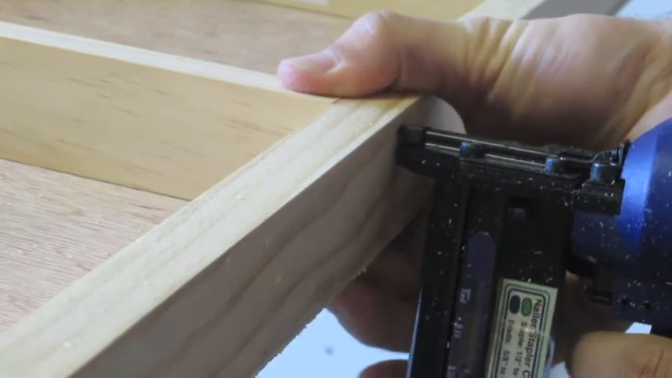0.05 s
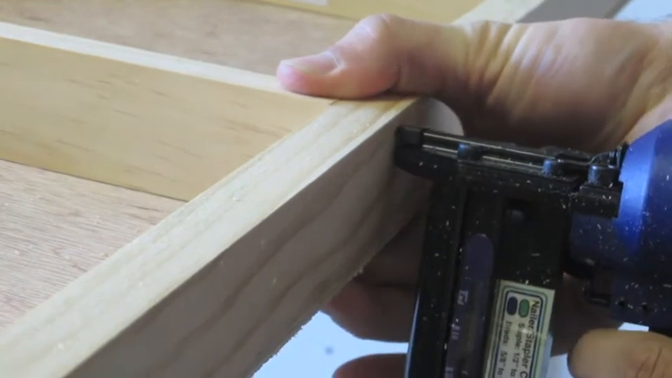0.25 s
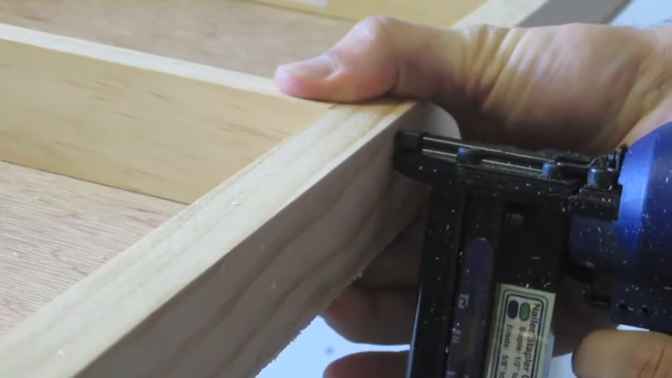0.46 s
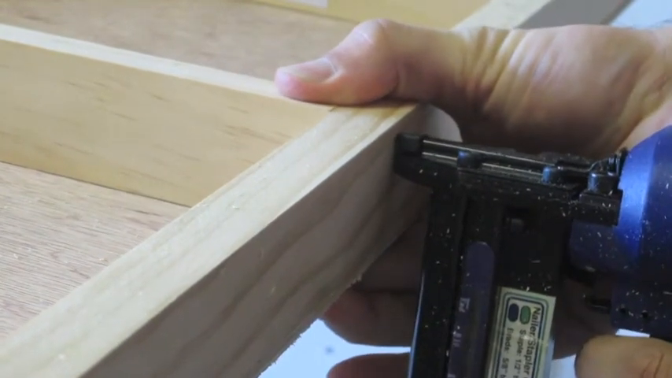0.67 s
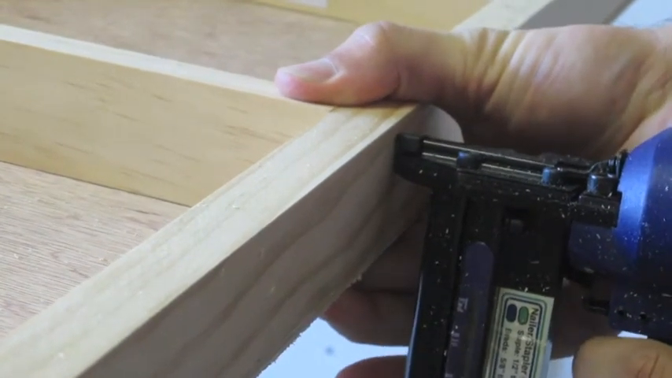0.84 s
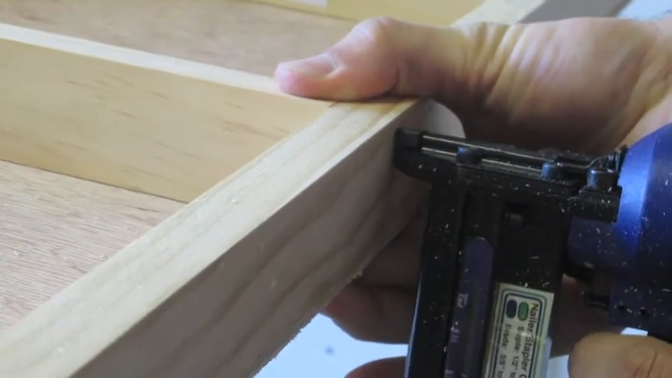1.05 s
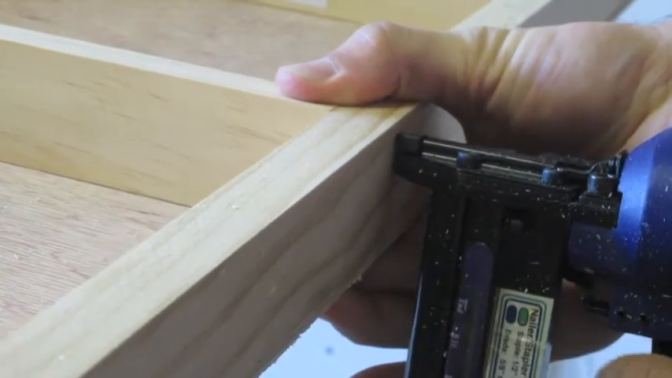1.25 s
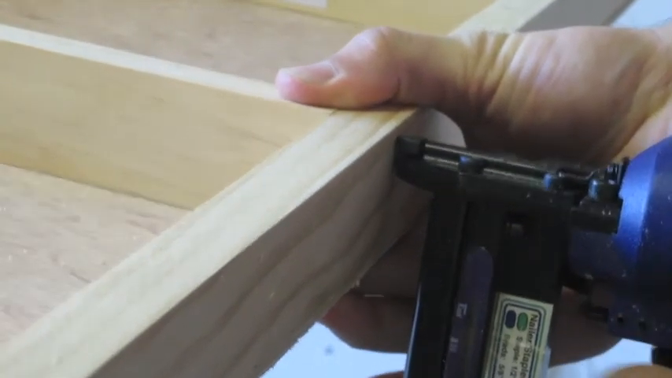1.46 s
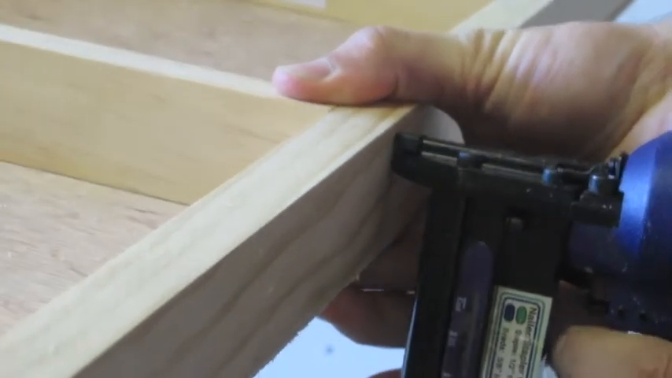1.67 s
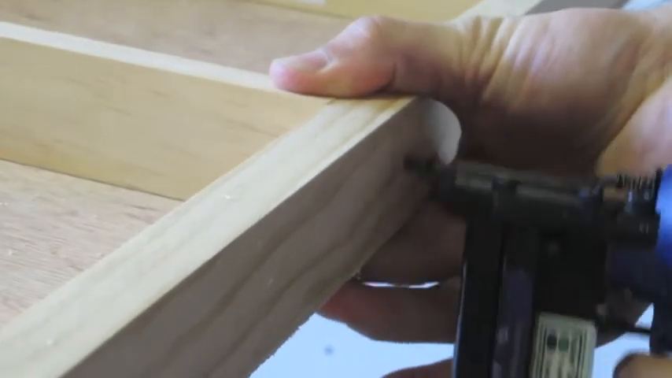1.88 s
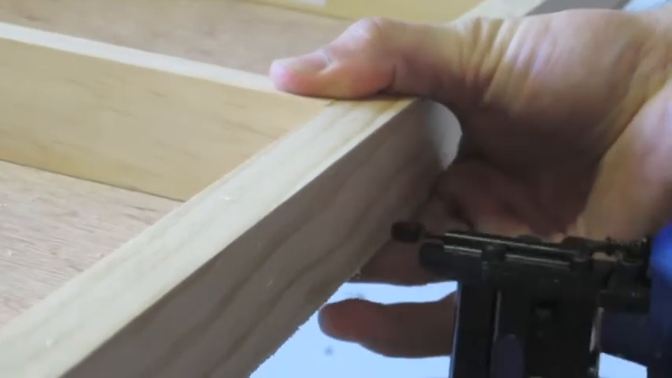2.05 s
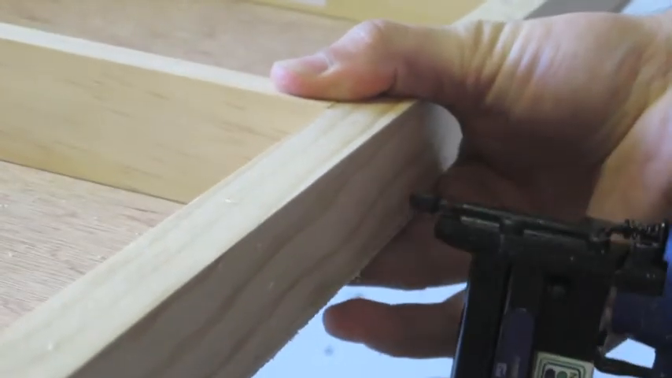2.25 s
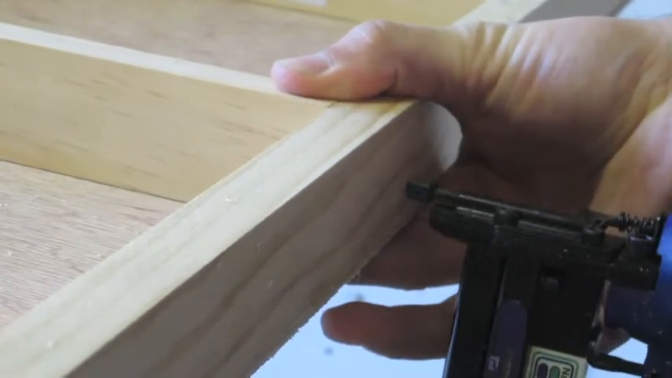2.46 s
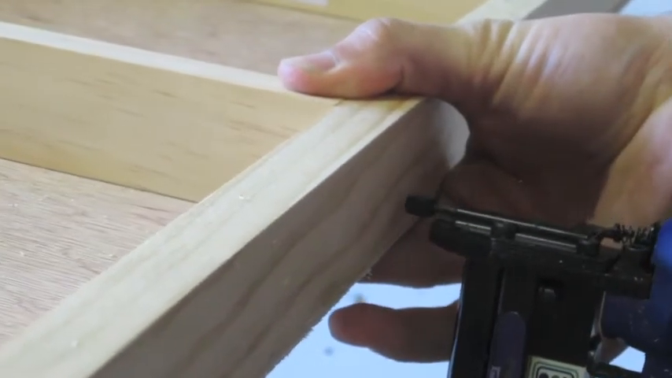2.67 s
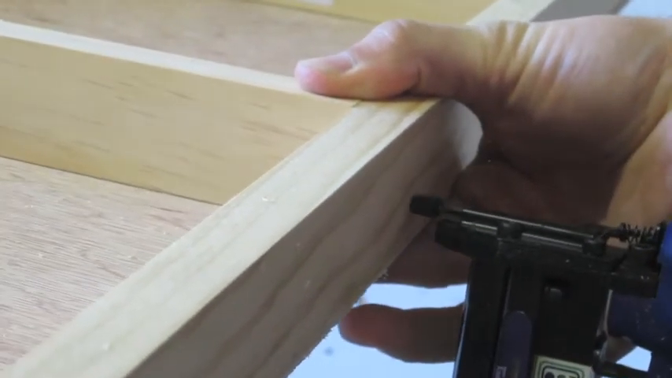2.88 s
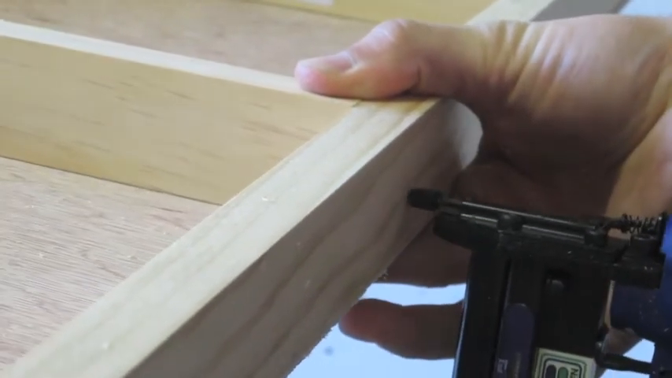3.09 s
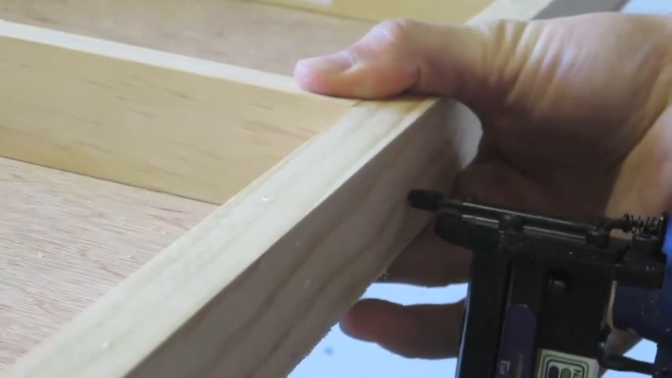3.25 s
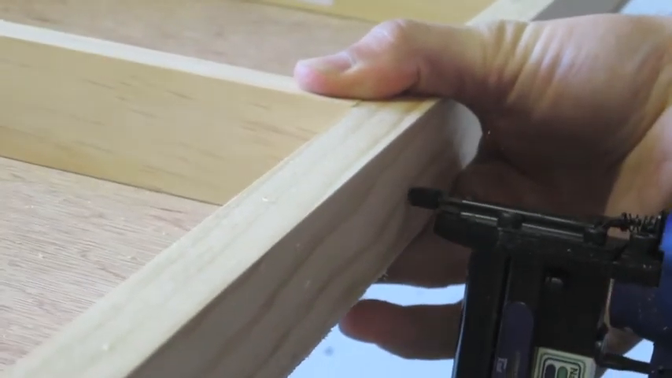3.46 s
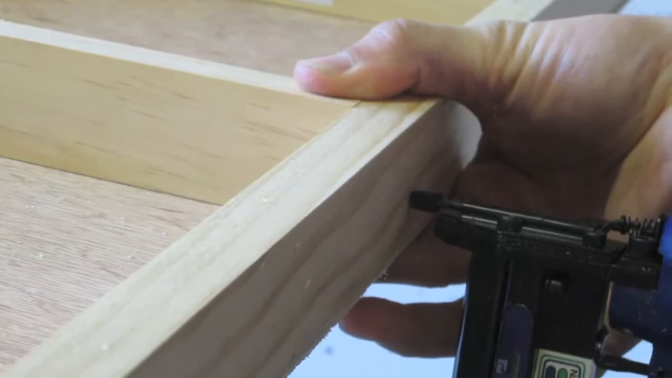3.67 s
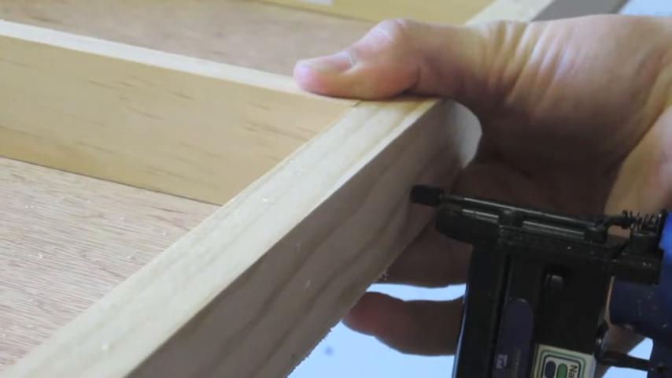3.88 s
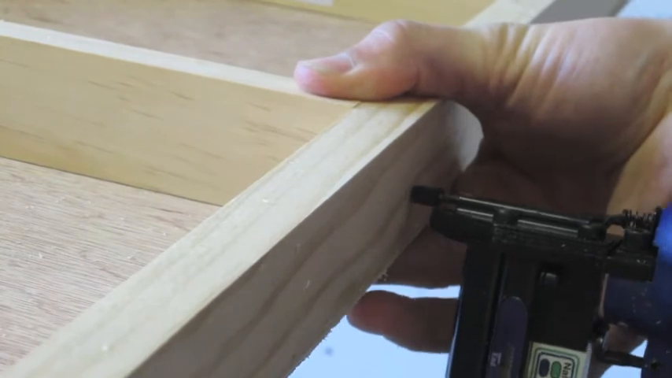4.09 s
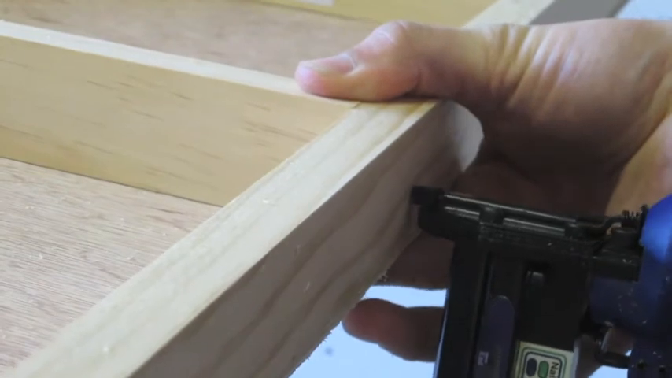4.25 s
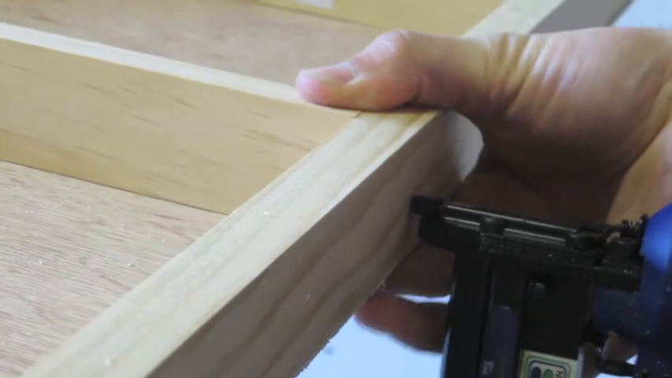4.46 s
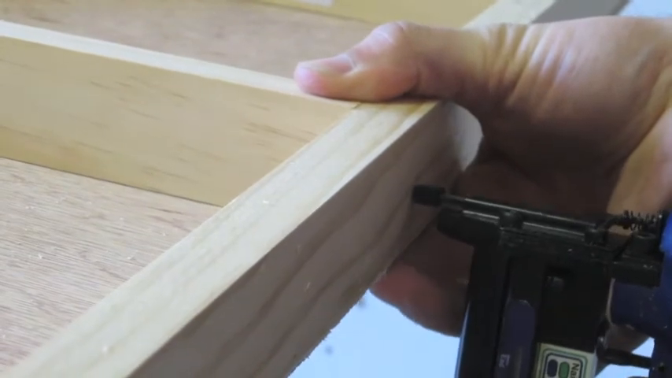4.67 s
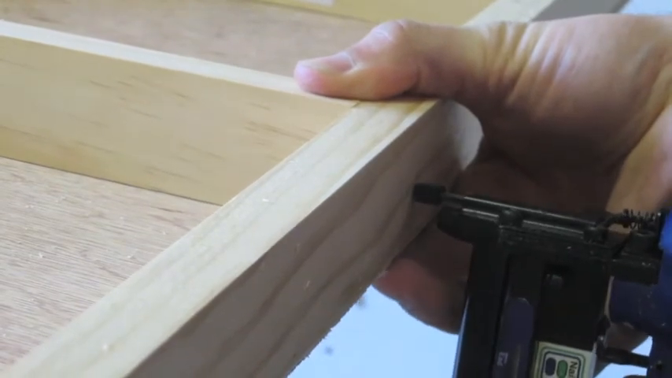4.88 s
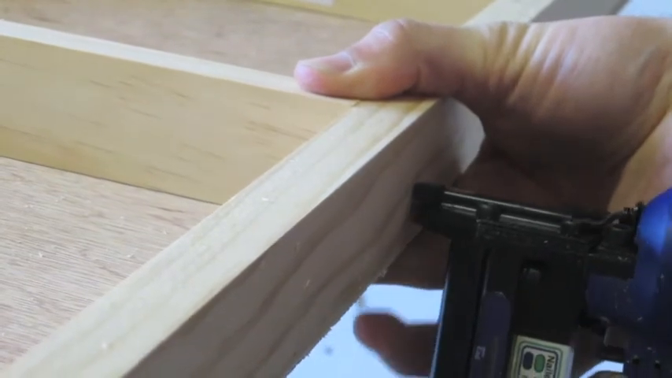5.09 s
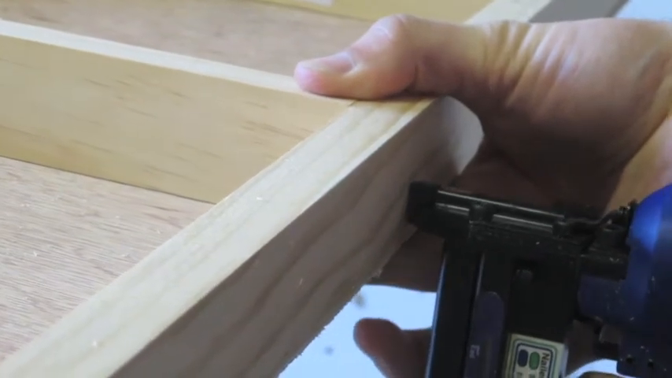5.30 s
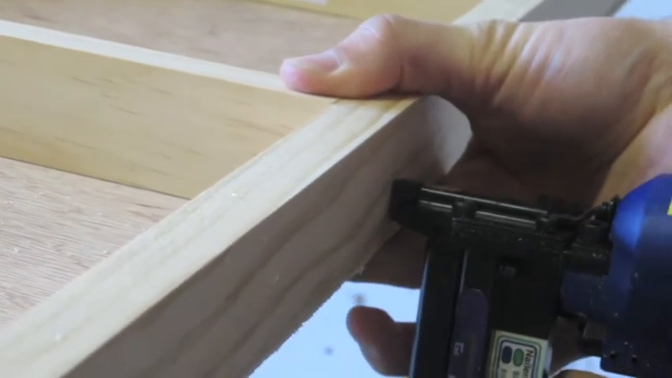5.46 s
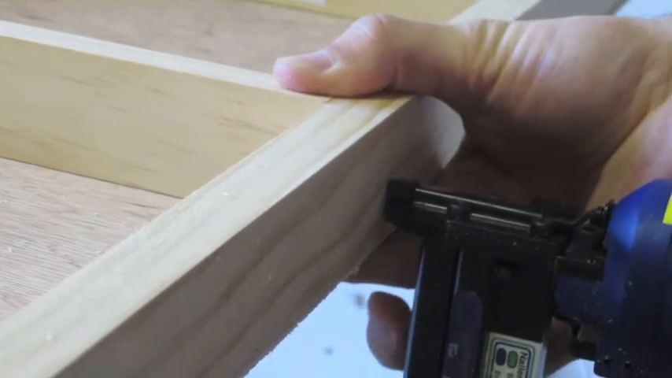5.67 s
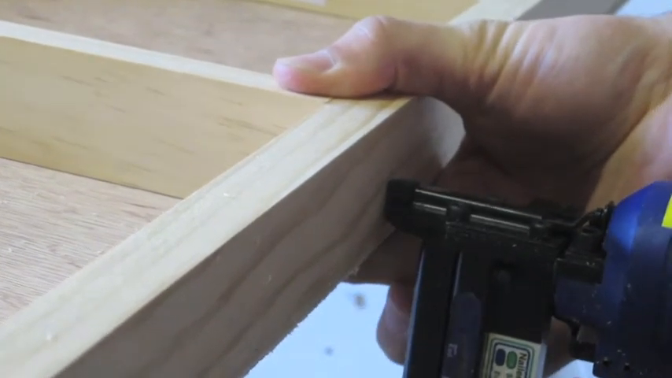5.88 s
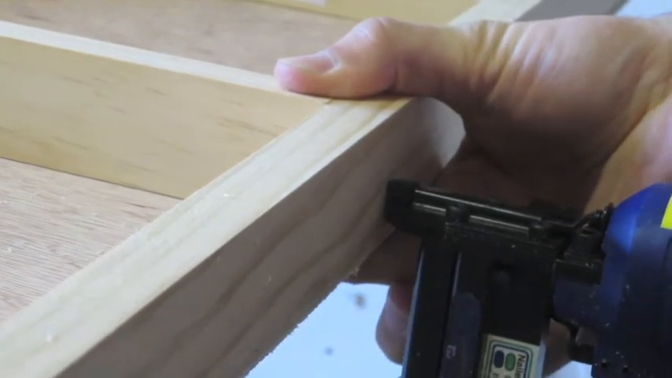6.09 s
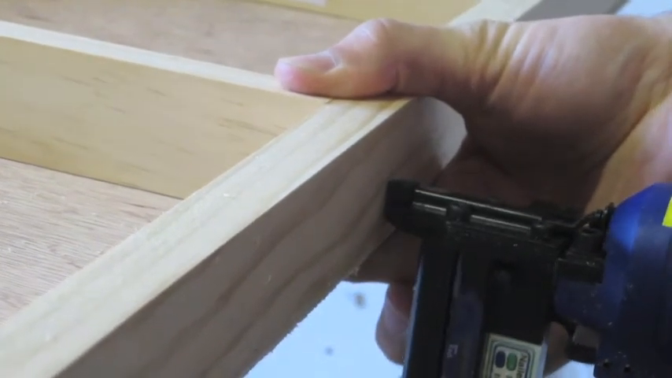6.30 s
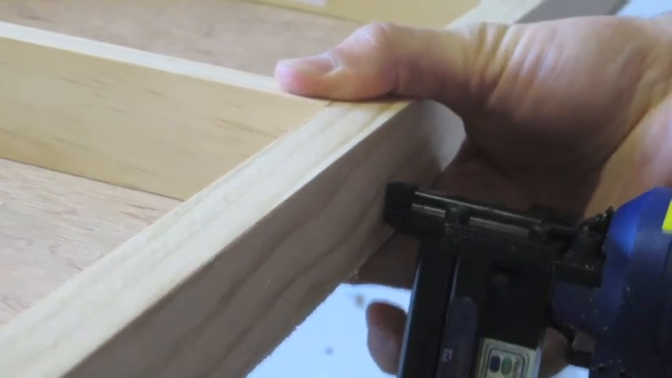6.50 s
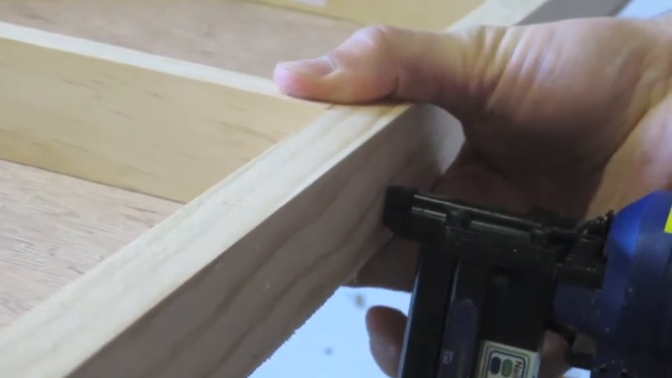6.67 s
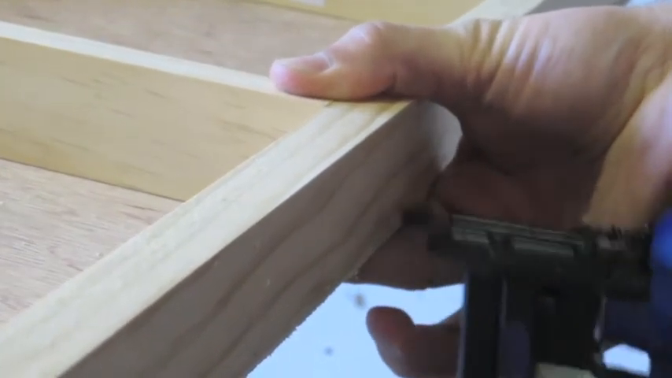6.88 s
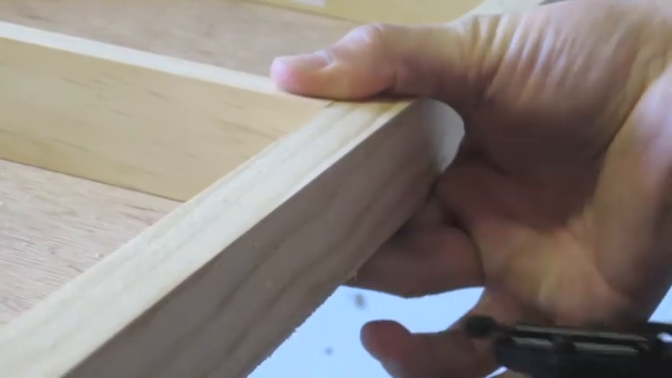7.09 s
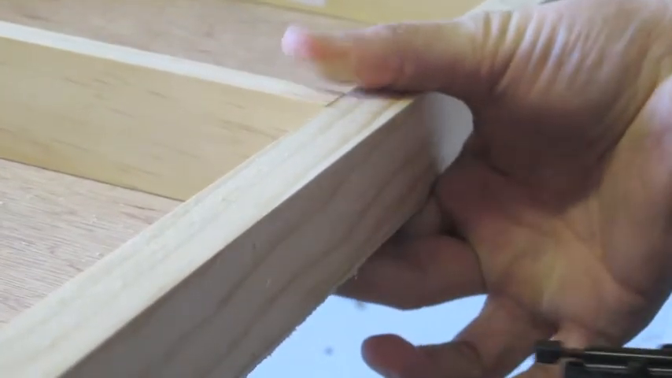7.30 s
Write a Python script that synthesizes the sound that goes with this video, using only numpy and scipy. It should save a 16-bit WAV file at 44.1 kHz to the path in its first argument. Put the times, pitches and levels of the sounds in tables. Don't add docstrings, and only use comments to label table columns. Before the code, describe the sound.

Low, soft workshop rumble. At 0.15 s the tool lightly knocks wood; cloth rustles and a thin, hoarse hose squeal wavers very faintly until 0.9 s, with tiny steel ticks around 0.95. At 1.29 a trigger tick, then at 1.32 a deafening sharp crack and woody slam, echoing brightly. At 1.52 a short dense air blast bursts out with a piston clack. The level ducks, then creeps back. A springy metallic chatter at 1.84 marks lift-off. Small clicks and knocks come at 2.8, 3.2, 3.4, 3.8 and 4.1, with soft rubbing near 2.6. Handling gets busier from 4.5 to 5.4: clacks, bumps, skin sliding on pine; another bump at 5.83. A tick at 6.31 leads into the second crack at 6.32, its exhaust at 6.51, ringing decay, then spring chatter at 6.86 and faint squeaks near 7.2.

```python
import sys
import numpy as np
from scipy import signal
from scipy.fft import rfft, irfft, next_fast_len
from scipy.io import wavfile
from scipy.ndimage import uniform_filter1d

SR = 44100
rng = np.random.default_rng(int(sys.argv[2]) if len(sys.argv) > 2 else 0)


def pcm_store(signal):
    levels = np.round(np.clip(np.atleast_2d(signal), -1, 1) * 32767)
    wavfile.write(sys.argv[1], SR, levels.astype(np.int16).T)


def nominal_scale(level):
    x = np.asarray(level, float) / 20
    return 10 ** x


N = 323780

# (time [s], push [dB], ring [dB], rattle [dB], room [dB])
BLOWS = [
    (1.3382, -12, -2, -14, 4),
    (6.3399, -17, -4, -14.5, 2.5),
]
# (valve opens [s], crack [dB], trigger lets go [s], exhaust [dB], piston stops [s])
SHOTS = [
    (1.315, -4.5, 1.519, -5, 1.542),
    (6.321, -5, 6.5078, -6, 6.531),
]
# (frequency [Hz], level per Hz [dB])
BLAST = [(35, -24.5), (60, -11.5), (691, -6.5), (1690, -12), (2190, -8), (2970, -7), (3420, -9),
         (3840, -6.5), (11300, -1.5), (15400, -7.5), (16500, -34.5)]


def unit(x):
    return x / np.sqrt(np.mean(x ** 2) + 1e-20)


def along(points, hz):
    f, v = np.transpose(points)
    return np.interp(np.log(hz + 1), np.log(f + 1), v)


def filtered(x, response):
    m = next_fast_len(len(x) + 4096)
    return irfft(rfft(x, m) * response(np.fft.rfftfreq(m, 1 / SR)), m)[:len(x)]


def resonant(modes):
    def response(f):
        return sum((-1) ** k * nominal_scale(db) * 1j * f * w / (c * c - f * f + 1j * f * w)
                   for k, (c, w, db) in enumerate(modes))
    return response


def hiss(n, spectrum):
    return unit(filtered(rng.standard_normal(n), lambda hz: nominal_scale(along(spectrum, hz))))


def shape(t, rise, hold, t60):
    return (1 - np.exp(-(np.maximum(t, 0) / rise) ** 2)) * nominal_scale(-60 * np.maximum(t - hold, 0) / t60)


def wander(n, size):
    return unit(uniform_filter1d(rng.standard_normal(n), size=size))


def tap(t, contact):
    return np.exp(-(t / contact - 2) ** 2)


def strikes(t, hits, grit_db, t60):
    force = nominal_scale(grit_db - 60 * t / t60) * rng.standard_normal(len(t))
    for s, db in hits:
        force[round(s * SR)] += nominal_scale(db)
    return force


def gain_db(s):
    rest_db, react_s, duck_s, creep_s = -0.28, 0.0085, 0.0048, 0.88
    blow_duck_db, stop_duck_db = -10.5, -5
    hold_s = (0.56, 0.85)
    out = rest_db + 0 * s
    for (blow_s, *_), (*_, stop_s), hold in zip(BLOWS, SHOTS, hold_s):
        left = np.exp(-np.maximum(s - stop_s - hold, 0) / creep_s)
        for at, db in ((blow_s, blow_duck_db), (stop_s, stop_duck_db)):
            out = out + left * db * np.clip((s - at - react_s) / duck_s, 0, 1)
    return out


def add(track, s, sound, room_db, modes=None, size=48):
    # (frequency [Hz], t60 [s])
    shop_t60 = [(100, 0.72), (300, 0.87), (1000, 0.82), (2500, 0.83), (5000, 0.75), (9000, 0.55),
                (15000, 0.36)]
    # (frequency [Hz], stretch of t60 [ratio])
    sheet_goods = [(1190, 1.2), (1560, 1.1), (2550, 1.5), (3600, 1.4), (5200, 0.84)]
    sheet_width_hz, peaky_db = 47, 2.5
    hz, t, z = signal.stft(rng.standard_normal(SR), SR, nperseg=512)
    if modes is None:
        power = uniform_filter1d(np.abs(rfft(sound, 8192)) ** 2, size=size)[::16]
        colour = np.sqrt(np.abs(power))
    else:
        colour = np.sqrt(sum(np.abs(resonant([mode])(hz)) ** 2 for mode in modes))
    colour = colour * (hz > 100)
    colour = colour * nominal_scale(peaky_db * rng.standard_normal(len(hz)))
    t60 = along(shop_t60, hz)
    for centre, stretch in sheet_goods:
        t60 = t60 * (1 + (stretch - 1) / (1 + ((hz - centre) / sheet_width_hz) ** 2))
    tail = signal.istft(z * colour[:, None] * nominal_scale(-60 * t / t60[:, None]), SR, nperseg=512)[1]
    middle = np.sum(np.arange(len(sound)) * sound ** 2) / np.sum(sound ** 2) / SR
    tail *= shape(np.arange(len(tail)) / SR - .003, 0.0086 + middle, 9, 1)
    out = nominal_scale(room_db) * tail * np.linalg.norm(sound) / np.linalg.norm(tail)
    out[:len(sound)] += sound
    part = track[round(s * SR):][:len(out)]
    part += out[:len(part)]


def air():
    # (frequency [Hz], level per Hz [dB])
    room_tone = [(12, -34.5), (20, -0.5), (51, -8), (89, -1.5), (265, -13), (440, -15.5), (492, -15),
                 (816, -12.5), (1050, -15.5), (1560, -19), (2440, -28.5), (6530, -33.5), (13200, -40.5),
                 (15200, -44.5), (16500, -59.5)]
    z = signal.stft(hiss(N + 512, room_tone), nperseg=512)[2]
    field = uniform_filter1d(rng.standard_normal(z.shape), size=5, axis=0)
    field = uniform_filter1d(field, size=16, axis=1)
    patchy = signal.istft(z * nominal_scale(1.0 * unit(field)), nperseg=512)[1][:N]
    return nominal_scale(-49) * unit(patchy)


def hose_squeal():
    # (time [s], lower line [Hz], upper line [Hz])
    glide = [(.2, 8300, 12800), (.27, 8450, 12860), (.33, 8800, 13500), (.39, 9450, 14150),
             (.43, 9750, 14330), (.5, 9500, 14200), (.57, 10050, 14550), (.624, 9650, 14200),
             (.71, 10100, 14750), (.78, 9400, 14415), (.86, 8050, 12400), (.93, 7000, 10100)]
    level_db, edge = -67.5, 0.22
    time = np.arange(N) / SR
    s, *lines = np.transpose(glide)
    done = np.clip((time - s[0]) / (s[-1] - s[0]), 0, 1)
    swell = np.abs(np.sin(np.pi * done)) ** edge * (time < s[-1])
    out = np.zeros(N)
    for hz, db in zip(lines, (-1.5, -7)):
        level = nominal_scale(level_db + db + 3.5 * wander(N, 900))
        pitch = np.interp(time, s, hz) + 70 * wander(N, 300)
        out += level * swell * np.sin(2 * np.pi * np.cumsum(pitch) / SR)
    return out


def rubbing():
    # (time [s], rise [s], hold until [s after start], heard level [dB])
    strokes = [
        (2.57, 0.11, 0.29, -58.5),
        (4.5, 0.03, 0.066, -58),
        (4.7, 0.037, 0.048, -65),
        (5.3, 0.051, 0.22, -52.5),
        (5.8, 0.034, 0.068, -52.5),
    ]
    # (frequency [Hz], level per Hz [dB])
    skin = [(710, -10), (1200, -3), (2040, -7), (2680, -9), (4080, -10), (9510, -17), (13500, -26.5),
            (16000, -31.5)]
    time = np.arange(N) / SR
    stroke = sum(nominal_scale(db) * shape(time - s, rise, hold, 0.37) for s, rise, hold, db in strokes)
    return stroke * hiss(N, skin) / nominal_scale(gain_db(time))


def rustling():
    # (time [s], length [s], from [Hz], to [Hz], heard level [dB])
    rustles = [(0.189, 0.21, 4230, 3500, -59.5), (0.444, 0.4, 2115, 2120, -61.5),
               (0.3, 0.68, 3880, 3850, -67), (0.169, 0.76, 2960, 2990, -68.5),
               (0.801, 0.12, 4970, 4900, -61), (0.814, 0.21, 4400, 4340, -64),
               (2.452, 0.11, 4500, 4100, -73), (3.57, .02, 5100, 4300, -64), (3.688, .03, 4300, 4700, -70),
               (3.81, 0.056, 3120, 3150, -63), (4.044, 0.16, 4800, 4630, -65),
               (4.148, 0.18, 4700, 4570, -69.5), (6.12, 0.19, 4500, 4170, -67.5)]
    # (time [s], length [s], from [Hz], to [Hz], heard level [dB])
    squeaks = [(0, .09, 8600, 8600, -66), (0.001, 0.043, 10300, 10300, -69), (.002, .05, 13100, 13200, -78),
               (.09, 0.031, 6800, 7200, -71), (0.15, 0.8, 2640, 2600, -60), (.4, .2, 8200, 8200, -75),
               (2.54, .08, 3650, 3550, -70), (3.522, 0.19, 5600, 5520, -71), (4.034, .02, 4050, 4800, -64),
               (4.043, .07, 4780, 4600, -58.5), (4.14, .06, 4650, 4600, -65),
               (4.43, 0.076, 9850, 10400, -71), (5.135, .06, 4060, 4020, -69),
               (7.18, .1, 12000, 12170, -88.5), (7.198, 0.095, 7050, 6700, -75),
               (7.205, 0.065, 10900, 10900, -84), (7.21, .09, 2710, 2680, -70)]
    # length [s], from [Hz], to [Hz], heard level [dB], width [Hz] after time [s]
    sleeve = (1.98, .62, 7000, 7000, -72, 10000)
    rows = [(*row, 0.21 * row[2]) for row in rustles]
    rows += [(*row, 160) for row in squeaks] + [sleeve]
    out, t = np.zeros(N), np.arange(SR * 3 // 4) / SR
    for s, lasts, from_hz, to_hz, db, width in rows:
        done = np.clip(t / lasts, 0, 1)
        turn = 2 * np.pi * np.cumsum(from_hz + (to_hz - from_hz) * done) / SR
        a, b = (unit(filtered(noise, lambda f: 1 / (1 + (2 * f / width) ** 2)))
                for noise in rng.standard_normal((2, len(t))))
        band = a * np.cos(turn) + b * np.sin(turn)
        swell = np.abs(np.sin(np.pi * done)) ** 0.5 * (done < 1)
        flutter = nominal_scale(1.1 * (width < 2000) * wander(len(t), 2500))
        part = out[round(s * SR):][:len(t)]
        part += (nominal_scale(db) * band * swell * flutter)[:len(part)]
    return out / nominal_scale(gain_db(np.arange(N) / SR))


def bench_bumps():
    # (time [s], level of each bench mode [dB] x 3)
    bumps = [(.15, -45.5, -47, -62), (1.338, -33.5, -31, -52), (1.529, -29.5, -27.5, -44),
             (2.83, -65, -52, -58), (4.518, -47, -53, -71), (5.096, -41.5, -53, -70),
             (5.207, -36.5, -30, -51.5), (5.832, -46.5, -41.5, -51), (6.341, -34.5, -27, -54),
             (6.52, -28.5, -27, -34.5)]
    # (frequency [Hz], t60 [s], rise [s], hold [s], after-ring [dB], after-ring t60 [s])
    bench = [
        (132, 0.37, .003, 0.051, -22, 1.2),
        (218, 0.11, 0.014, 0.028, -15.5, 1.7),
        (413.6, 0.41, 0.009, 0.036, -24.5, 1.2),
    ]
    out, t = np.zeros(N), np.arange(SR * 3 // 4) / SR
    for s, *levels in bumps:
        ring = np.zeros(len(t))
        for db, (hz, t60, rise, hold, late_db, late_t60) in zip(levels, bench):
            decay = shape(t, rise, hold, t60) + nominal_scale(late_db) * shape(t, rise, hold, late_t60)
            ring += nominal_scale(db) * np.sin(2 * np.pi * hz * t) * decay
        add(out, s, ring, room_db=-12.5, size=6)
    return out


def nose_knocks():
    # (time [s], heard peak [dB], room [dB])
    knocks = [(0.149, -39, -1), (.747, -64, -4), (1.294, -39, 7), (2.808, -35.5, -4), (2.819, -39, -7),
              (2.83, -38, 1), (3.4291, -35.5, 2), (3.443, -36, -1.5), (3.66, -43, 4), (3.931, -43.5, -4),
              (4.52, -36, -1), (4.612, -36, -1), (4.749, -39, 0), (5.113, -38, 2), (5.207, -30.5, -3.5),
              (5.398, -36.5, 6), (5.827, -31, 0), (6.141, -50, -8), (6.3098, -36, -2)]
    # (frequency [Hz], width [Hz], level [dB])
    pine = [(254, 130, -4), (424, 71, -0.5), (573, 72, -2.5), (730, 63, 3), (930, 280, -2),
            (1280, 470, -11)]
    out, t = np.zeros(N), np.arange(SR // 15) / SR
    for s, db, room_db in knocks:
        jogs = rng.normal(0, 1.7, len(pine))
        board = resonant([(hz, w, level + jog) for (hz, w, level), jog in zip(pine, jogs)])
        ring = filtered(tap(t, 0.00012), board)
        add(out, s, nominal_scale(db - gain_db(s)) * ring / np.abs(ring).max(), room_db)
    return out


def steel_ticks():
    # (time [s], heard peak [dB], frequency [Hz], width [Hz])
    ticks = [(0.768, -38.5, 10000, 5000), (0.9397, -33, 8800, 5030), (.946, -45, 10000, 4000),
             (0.97, -33, 9650, 4002), (0.988, -38, 10100, 4000), (1.29, -25, 12000, 2500),
             (1.29, -27, 8200, 1500), (1.29, -29, 5000, 2000), (1.828, -42, 9250, 4970),
             (2.8267, -42, 12580, 2000), (3.1596, -46, 7000, 6000), (3.1635, -40, 4500, 3000),
             (3.1663, -44, 6000, 5000), (3.4369, -31.5, 10350, 1900), (3.453, -45, 8900, 5000),
             (3.8062, -41, 11000, 4000), (4.1068, -40, 8200, 1500), (4.1068, -39.5, 11200, 2500),
             (4.521, -23, 7500, 2500), (4.591, -41, 8600, 3500), (4.607, -50, 10000, 3000),
             (4.655, -37.5, 7800, 4000), (4.66, -50, 10000, 5000), (4.749, -34, 7500, 2500),
             (4.768, -48, 9800, 2000), (4.9534, -33.5, 9400, 5000), (5.084, -48, 9000, 5000),
             (5.095, -47, 6500, 2000), (5.112, -37, 10500, 5000), (5.116, -31, 7300, 1500),
             (5.138, -43, 7500, 2000), (5.207, -52, 6450, 3000), (5.369, -45, 10000, 6000),
             (5.827, -37, 7500, 6000), (6.3088, -18.5, 8400, 1500), (6.3094, -23, 12500, 3020),
             (6.82, -43, 11000, 4000), (6.849, -36, 12260, 1200), (6.85, -42, 8000, 2500)]
    out, t = np.zeros(N), np.arange(SR // 15) / SR
    for s, db, hz, width in ticks:
        force = 1. * (t == 0) + 0.2 * rng.standard_normal(len(t)) * nominal_scale(-60 * t / 0.01)
        ring = filtered(filtered(force, resonant([(hz, width, 0)])), resonant([(hz, 2 * width, 0)]))
        ring = filtered(ring, lambda f: resonant([(6000, 13000, 0)])(f) / (1 + 1j * f / 9000))
        add(out, s, nominal_scale(db - gain_db(s)) * ring / np.abs(ring).max(), -14.5, size=200)
    return out


def tool_clicks():
    # (time [s], heard peak [dB], lows [dB], room [dB])
    magazine = [(1.095, -42.5, -24, -10), (2.8282, -32, -5, -6), (3.1635, -43.5, -20, -6.5),
                (3.1706, -48, -20, -18.5), (3.438, -44, -5, -0.5), (3.445, -40, -7, -20),
                (3.452, -39, -5, -21.5), (3.461, -48, -6.5, -20), (3.6596, -49, -4, -3.5),
                (3.667, -53, -5, -8), (3.8048, -33.5, -12, -9.5), (3.927, -46, -4, -8),
                (4.1508, -47.5, 6, 1), (4.606, -43, -8, -12), (4.7359, -34, -3.5, -2),
                (4.7489, -32, -2.5, -27), (5.1153, -32.5, -10, -6.5), (5.206, -38.5, -6, -3), ]
    # (time [s], heard peak [dB], lows [dB], room [dB])
    nose = [(0.146, -35.5, 2.5, -2), (2.812, -40, -9.5, -16.5), (2.8174, -38, -1, -18),
            (2.826, -32.5, -5, -26), (2.832, -41, 3, -22), (3.812, -48.5, -2, -15), (4.484, -49, 7, -15),
            (4.5203, -29.5, -8, -7), (4.525, -34, -3, -5), (4.532, -39, 0, -16), (4.765, -42, -10, -23),
            (5.083, -53, 2, 8), (5.396, -31.5, -1, -3), (5.826, -27, -4, -11.5), (7.302, -61, -12, 0)]
    # (time [s], heard peak [dB], lows [dB], room [dB])
    trigger = [
        (1.292, -46, -6, -9.5),
        (6.31, -42, -2, -8.5),
    ]
    # (frequency [Hz], width [Hz])
    tool_body = [(800, 3100), (1400, 390), (2130, 250), (2750, 570), (3700, 590), (4700, 600), (5800, 480),
                 (7000, 1100), (8300, 1200), (9600, 1100), (10900, 560), (12300, 830), (14500, 3600)]
    rows = [(*row, 0.0017, -28) for row in magazine]
    rows += [(*row, 0.00099, -4.5) for row in nose]
    rows += [(*row, 0.0045, 3.5) for row in trigger]
    out, t = np.zeros(N), np.arange(SR // 25) / SR
    for s, db, lows_db, room_db, lasts, highs_db in rows:
        colour = [(800, lows_db - 7.0), (1500, lows_db + 11.0), (4200, 0.0003),
                  (6000, highs_db / 4), (9500, highs_db - 1.0), (14500, highs_db - 18)]
        jogs = rng.normal(0, 2.1, len(tool_body))
        body = resonant([(hz, w, along(colour, hz) + jog) for (hz, w), jog in zip(tool_body, jogs)])
        force = 5.2 * (t == 0) + rng.standard_normal(len(t)) * shape(t, 0.00011, lasts, 0.027)
        chatter = filtered(force, body)
        chatter = filtered(chatter, resonant([(4500, 17000, 0)]))
        presence = filtered(chatter, lambda hz: (hz > 2500) & (hz < 7000))
        chatter *= nominal_scale(db - gain_db(s)) / np.abs(presence).max()
        add(out, s, chatter, room_db, size=110)
    return out


def nose_spring():
    # (time [s], heard peak [dB], pace [ratio], room [dB])
    snaps = [
        (1.8376, -20.5, .9, -11),
        (6.8585, -20, 1.1, -11),
    ]
    # (frequency [Hz], width [Hz], level [dB])
    spring_modes = [
        [(1490, 140, -2), (2630, 100, 2), (3730, 170, -1), (5030, 160, -3.5), (6840, 300, -13), (9250, 190, 3),
         (10900, 180, -8.5), (12150, 215, -7), (13020, 138, -11), (13500, 100, -17)],
        [(1480, 110, -5.5), (2230, 69, -3.5), (2900, 170, -7), (3700, 270, -1.5), (5000, 160, -11),
         (7160, 140, -1), (8600, 110, -6), (10100, 210, 0.5), (13900, 350, -23), (14800, 150, -19)],
    ]
    # (time after first [s], level [dB])
    contacts = [
        (0, -3),
        (.0023, -3.5),
        (.0052, 2),
        (.0083, -2),
        (.012, -16),
    ]
    out, t = np.zeros(N), np.arange(SR // 20) / SR
    for (s, db, pace, room_db), modes in zip(snaps, spring_modes):
        shake = strikes(t, [(pace * at, level) for at, level in contacts], -13.5, 0.048)
        body = [(hz, 1.75 * w, level) for hz, w, level in modes] + [(6000, 15000, -15.5)]
        chatter = filtered(shake, resonant(body))
        room_modes = [(hz, 4 * w, level) for hz, w, level in modes] + [(2500, 4600, -1)]
        add(out, s, nominal_scale(db - gain_db(s)) * chatter / np.abs(chatter).max(), room_db, room_modes)
    return out


def steel_ring():
    # (frequency [Hz], level [dB], t60 [s])
    steel = [
        [(1610, -36, .7), (1776, -30.5, .3), (1970, -39.5, .7), (2870, -40, .7), (3655, -36.5, .5),
         (3780, -36.5, .6), (5000, -37, .55), (5276, -38.5, .5), (5730, -40.5, .6)],
        [(1027, -36.5, .6), (1130, -34.5, 0.8), (1450, -38, .9), (2140, -37, .8), (3456, -43.5, .7),
         (3800, -41.5, .55), (4603, -34, .4), (5470, -43.5, .7), (6740, -41.5, .5)],
        [(1175, -29.5, 0.83), (1626, -34, .65), (2300, -30, 0.78), (4048, -44.5, .8), (4603, -34, .35),
         (4770, -28, 0.52), (6417, -39.5, 0.557), (7630, -38, .45), (8769, -36, .35)],
        [(1210, -36.5, 0.72), (1500, -31.5, .7), (2550, -39.5, .6), (3700, -42, .55), (4560, -45, 0.77),
         (5310, -45.5, .6), (5810, -44, .55), (7127, -39, 0.53), (8170, -39, .5)],
    ]
    # (time [s], frequency [Hz], heard level [dB], t60 [s])
    after_clicks = [(1.84, 3730, -68, .35), (1.84, 1214, -55, .5), (2.83, 3700, -59, 0.42),
                    (3.807, 3180, -65, 0.22), (3.83, 5500, -70, .4), (4.146, 2300, -47, .05),
                    (4.521, 2140, -56, .3), (4.521, 4230, -60, .3), (4.749, 2130, -56, .3),
                    (5.117, 4010, -60, .3), (5.398, 2060, -58, .35), (6.86, 3330, -59, 0.75),
                    (6.86, 5100, -62, 0.68), (6.86, 1530, -62, 0.5)]
    impacts = [row[0] for row in BLOWS] + [row[-1] for row in SHOTS]
    rows = [(s, *mode) for s, modes in zip(impacts, steel) for mode in modes]
    rows += [(s, hz, db - gain_db(s), t60) for s, hz, db, t60 in after_clicks]
    out, t = np.zeros(N), np.arange(SR * 3 // 4) / SR
    for s, hz, db, t60 in rows:
        flutter = wander(len(t), 1300)
        line = np.sin(2 * np.pi * hz * t + 1.5 * flutter[::-1])
        ring = nominal_scale(db + 6 * flutter) * shape(t, 0.01, 0, t60) * line
        out[round(s * SR):][:len(t)] += ring[:N - round(s * SR)]
    return out


def gusts():
    level_db, lasts_s, lead_s = -22, 0.016, 0.0013
    time, out = np.arange(N) / SR, np.zeros(N)
    for _, _, s, _, _ in SHOTS:
        shove = np.sin(np.pi * np.clip((time - s + lead_s) / lasts_s, 0, 1)) ** 2
        out += nominal_scale(level_db) * shove * (1 + .5 * hiss(N, [(20, 7.0), (400, -4.0), (900, -63.0)]))
    return out


def piston_stops():
    # (frequency [Hz], width [Hz], level [dB])
    housing = [(875, 350, -14.5), (1153, 90, 5.5), (1540, 110, 3), (2500, 610, -5), (3700, 650, -8.5),
               (4800, 250, -8.5)]
    out, t = np.zeros(N), np.arange(SR // 10) / SR
    for *_, s in SHOTS:
        knock = strikes(t, [(0, 0), (.003, 1.5)], -19.5, .015)
        add(out, s, nominal_scale(-8) * unit(filtered(knock, resonant(housing))) / 4, -1, housing)
    return out


def exhausts():
    # (lead [s], length [s], level under exhaust [dB], exhaust rise [s])
    leaks = [
        (.016, 0.0085, -18, 0.0019),
        (0.021, 0.008, -12, 0.0018),
    ]
    room_db = -2
    out, t = np.zeros(N), np.arange(SR // 10) / SR
    for (_, _, s, db, _), (lead, lasts, leak_db, rise) in zip(SHOTS, leaks):
        leak = nominal_scale(db + leak_db) * shape(t, 0.0027, lasts, 0.0046) * hiss(len(t), BLAST)
        add(out, s - lead, leak, room_db)
        blast = nominal_scale(db) * shape(t, rise, 0.024, 0.025) * nominal_scale(-80 * t) * hiss(len(t), BLAST)
        add(out, s, blast, room_db)
    return out


def valve_cracks():
    # (frequency [Hz], level per Hz [dB])
    crack_air = [(290, -37), (500, -5.5), (1450, -11), (2810, -3.5), (9000, -4), (13000, -8.5),
                 (15300, -11.5), (16500, -23.5)]
    # (frequency [Hz], level per Hz [dB])
    jet_air = [(290, -49.5), (500, -15), (1130, -21.5), (2730, -17.5), (3880, -1.5), (5040, -4.5),
               (12500, -4), (15300, -14), (16500, -38)]
    # (frequency [Hz], width [Hz], level [dB])
    cap_rings = [
        [(3100, 1230, -1.5), (5770, 860, -2), (6700, 920, -4.5), (8900, 960, -1.5), (11300, 760, -1),
         (13200, 800, -8.5), (15200, 430, -10.5)],
        [(2980, 370, -6), (4590, 810, -5.5), (6000, 700, -6), (7830, 430, 1.5), (9800, 1200, -9.5),
         (12000, 430, -2.5), (15400, 800, -13.5)],
    ]
    out, t = np.zeros(N), np.arange(SR // 10) / SR
    for (s, crack_db, *_), cap_modes in zip(SHOTS, cap_rings):
        crack = nominal_scale(crack_db - 6) * shape(t - .0008, 0.0008, 0.0017, 0.0058) * hiss(len(t), crack_air)
        hits = strikes(t, [(.0009, -11), (.0016, 0), (.0023, -2.5), (.0032, -5.5)], -15.5, 0.021)
        clang = filtered(hits * shape(t, .0011, 9, 1), resonant(cap_modes))
        clang = nominal_scale(crack_db + 4.5) * clang / np.abs(clang).max()
        cap = nominal_scale(crack_db - 3.5) * np.sin(2 * np.pi * 2800 * t) * shape(t, 0.00094, 0.00064, 0.0042)
        jet = nominal_scale(-19.5) * shape(t, 0.0022, 0.021, .01) * nominal_scale(-190 * t) * hiss(len(t), jet_air)
        push = -nominal_scale(-15) * np.sin(2 * np.pi * 350 * t) * shape(t, 0.00023, 0.00075, 0.0037)
        add(out, s, crack + clang + cap + jet + push, -2.5)
    return out


def driver_blows():
    # (frequency [Hz], width [Hz], level [dB])
    nailed = [
        [(355, 370, -11.5), (890, 460, -10.5), (1140, 330, -5.5), (1650, 190, 2.5), (2030, 150, -2.5),
         (2500, 780, -7), (3750, 130, -3.5), (4900, 300, -4), (7000, 2800, -15)],
        [(364, 350, -8), (690, 88, -10.5), (1030, 200, 4), (1230, 250, -0.5), (1580, 110, -4.5),
         (2000, 400, -3), (2600, 610, -6.5), (3500, 250, -8), (4480, 260, -3.5), (5550, 270, -4),
         (7500, 3000, -13.5)],
    ]
    # (frequency [Hz], width [Hz], level [dB])
    guides = [
        [(1134, 230, -2), (1500, 68, -1.5), (2360, 98, -4), (2930, 98, -3), (3940, 180, -1), (4530, 84, -2.5),
         (4700, 110, -0.5), (6800, 100, -4.5), (7500, 140, -4), (8000, 140, -11)],
        [(1070, 140, -1.5), (2500, 140, -4), (2780, 120, -5), (3730, 320, -2), (4300, 170, 1),
         (5800, 170, -3.5), (6400, 90, -14), (6880, 170, -15), (8200, 95, -6.5), (8800, 110, -7.5)],
    ]
    # (frequency [Hz], level [dB])
    thuds = [
        (1540, -7.5),
        (1330, -5),
    ]
    out, t = np.zeros(N), np.arange(SR // 10) / SR
    for (s, push_db, ring_db, rattle_db, room_db), modes, guide, (thud_hz, thud_db) in zip(
            BLOWS, nailed, guides, thuds):
        late = .00016 * np.logaddexp(0, (t - .00095) / .00016)
        thud = -nominal_scale(thud_db) * np.sin(2 * np.pi * thud_hz * late) * shape(t, .0004, 0.0022, 0.0039)
        u = t / 0.00051
        push = -nominal_scale(push_db) * u ** 2 * np.exp(2 - u) / 4 * np.cos(u - 1.3)
        snap = nominal_scale(rattle_db + 1.5) * shape(t - .0009, 0.00045, 0.001, 0.0039) * hiss(len(t), BLAST)
        impulse = np.exp(-((t - .0013) / .00004) ** 2)
        ring = filtered(impulse, resonant([(hz, 0.82 * w, db) for hz, w, db in modes]))
        ring = nominal_scale(ring_db) * ring / np.abs(ring).max()
        loose = resonant([(hz, 3.1 * w, db) for hz, w, db in guide])
        rattle = unit(filtered(rng.standard_normal(len(t)), loose))
        rattle = nominal_scale(rattle_db) * rattle * shape(t - .001, 0.0018, 0.018, 0.061)
        add(out, s, push + snap, room_db - 10.5)
        add(out, s, thud + ring + rattle, room_db, modes)
    return out


def scene():
    background = air() + hose_squeal() + rubbing() + rustling()
    handling = bench_bumps() + nose_knocks() + steel_ticks() + tool_clicks() + nose_spring()
    shots = steel_ring() + gusts() + piston_stops() + exhausts() + valve_cracks() + driver_blows()
    return (background + handling + shots)[None]


def roll_off(x):
    return signal.sosfilt(signal.butter(12, 16840, fs=SR, output="sos"), x)


def record(dry):
    # (frequency [Hz], level per Hz [dB])
    converter = [(20, -12.5), (1000, -1.5), (4000, 5), (12000, -9), (14300, -16), (16500, -32)]
    x = dry[0] * nominal_scale(gain_db(np.arange(N) / SR))
    x = x / (1 + np.abs(x / .74) ** 5) ** (1 / 5)
    x = x + nominal_scale(-76) * hiss(N, converter)
    x = filtered(x, lambda hz: nominal_scale(np.interp(hz, [15700, 16000, 16800], [0, -28, -50])))
    return roll_off(x[None])


dry = scene()
out = record(dry)
pcm_store(out)
```